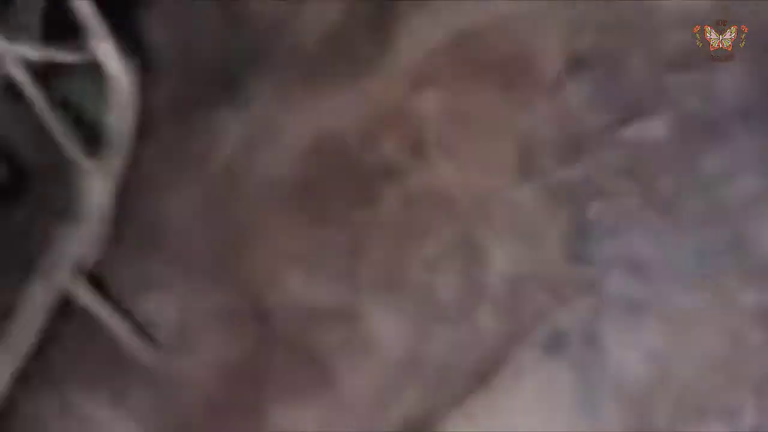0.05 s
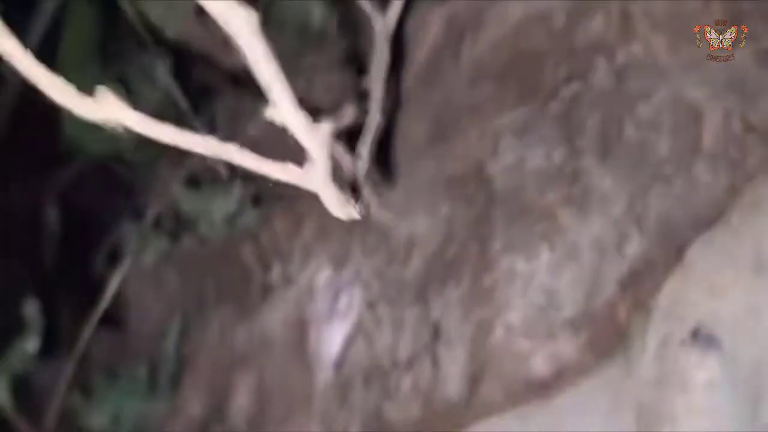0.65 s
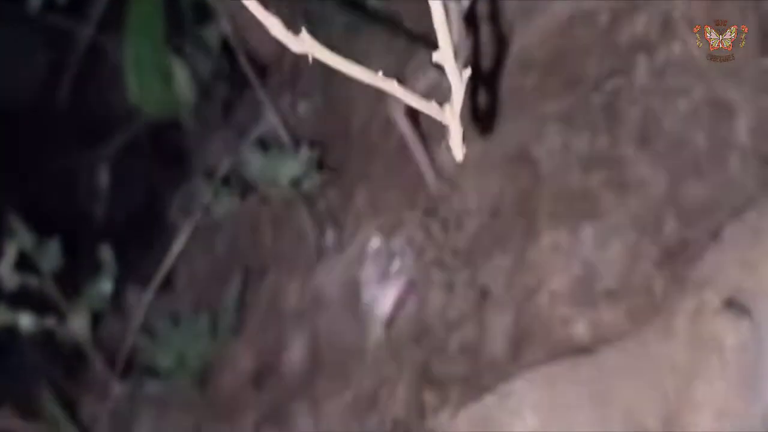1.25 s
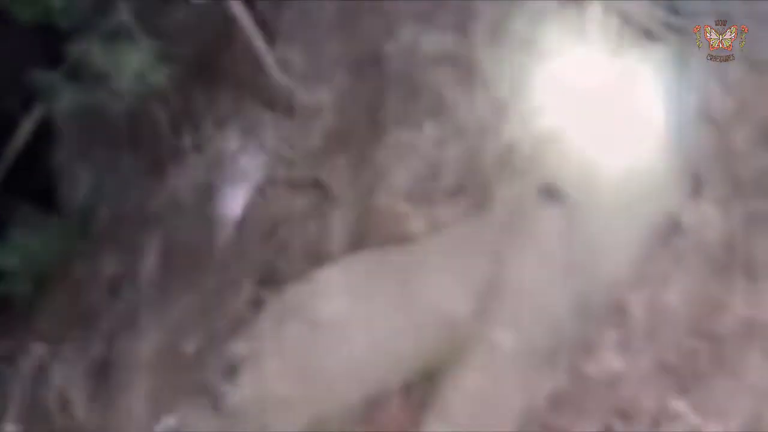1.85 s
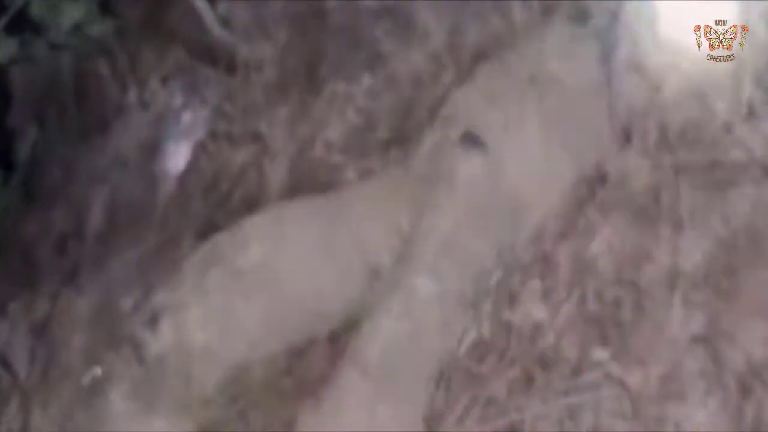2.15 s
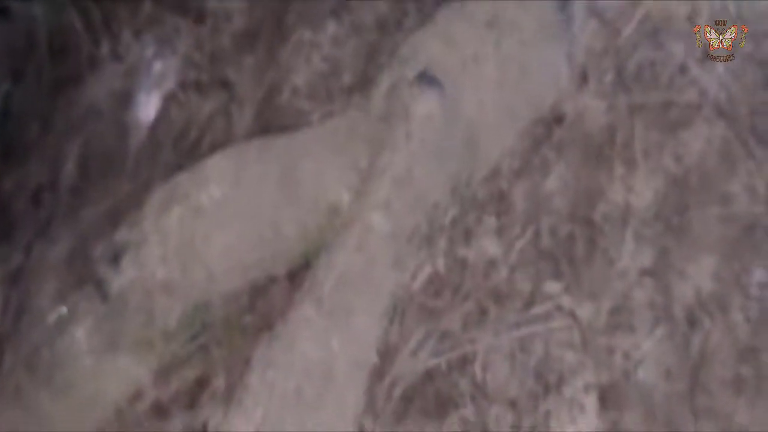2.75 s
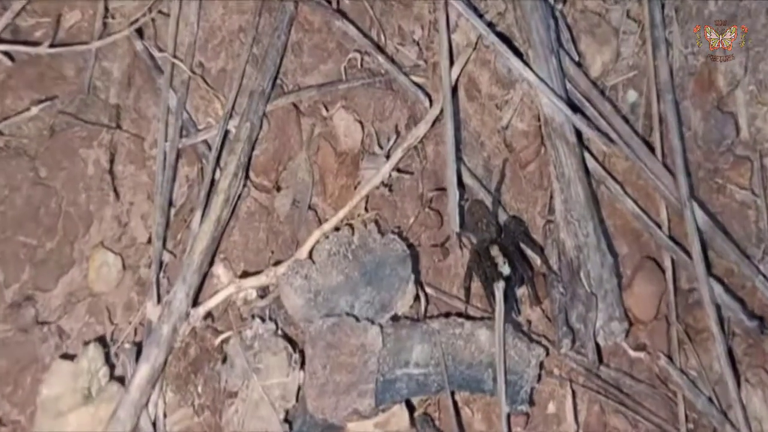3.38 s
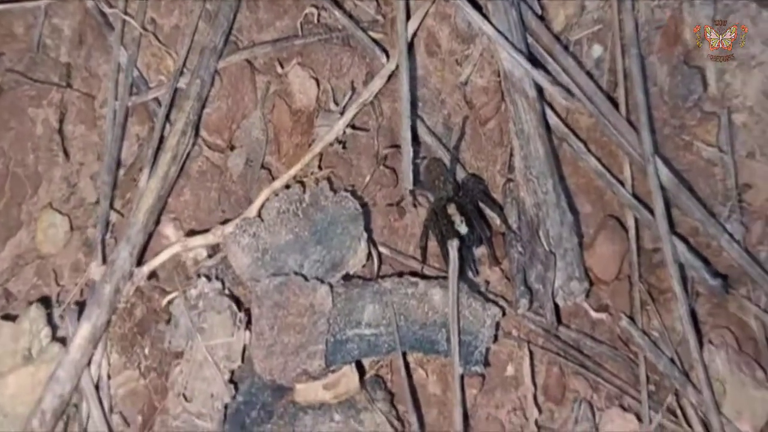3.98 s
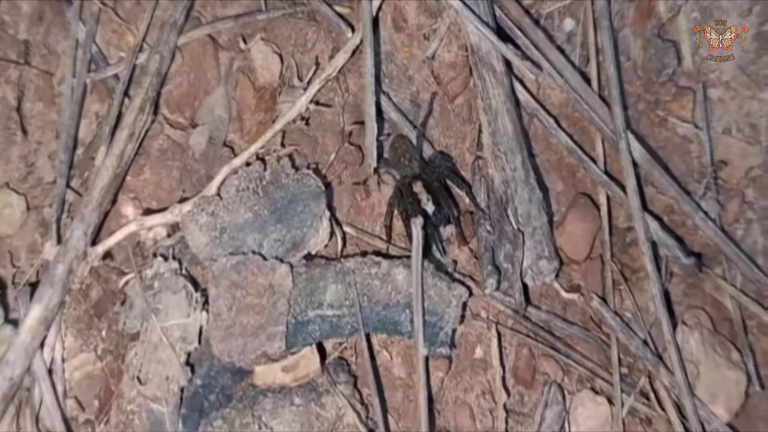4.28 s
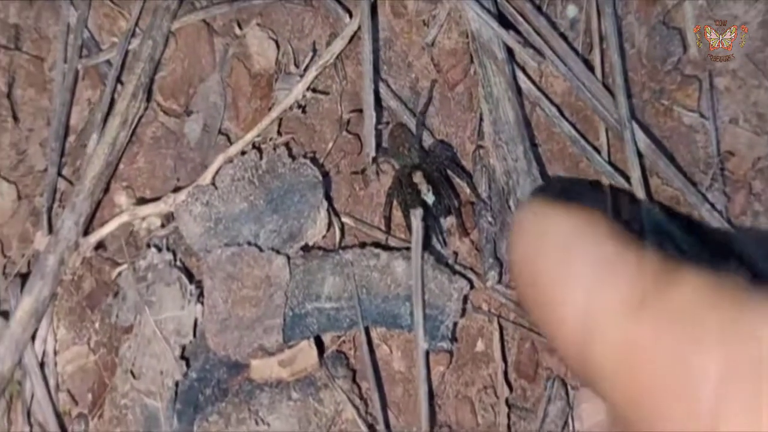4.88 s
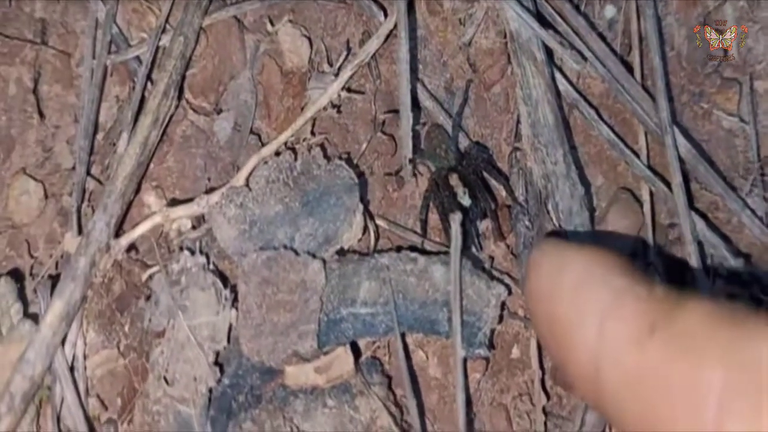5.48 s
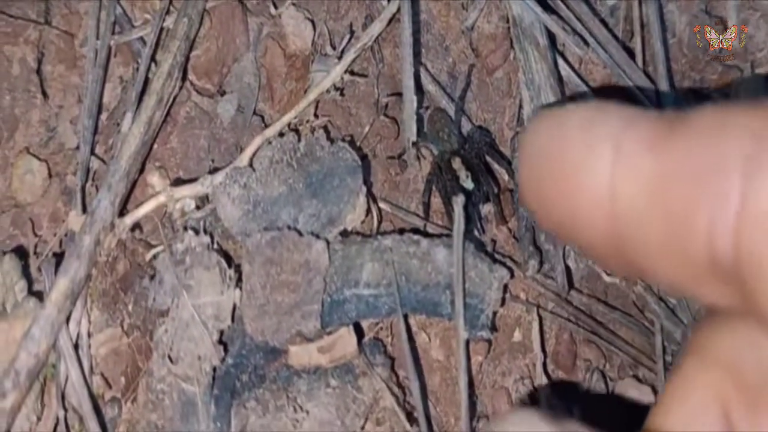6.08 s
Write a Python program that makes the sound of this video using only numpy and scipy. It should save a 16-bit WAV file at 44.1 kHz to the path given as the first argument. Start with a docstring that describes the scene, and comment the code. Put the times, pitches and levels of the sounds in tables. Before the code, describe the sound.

A night forest chorus: high frog trills swell and stop while quick ticks, cricket chirps and a thin hiss carry on.

```python
"""A forest at night. From the start a small frog ticks over a distant chorus, a high hiss and a slow,
almost inaudible bass throb. A near frog and a farther one trill together with pulses of their vocal
sacs, swelling as they go. Faint far whistles and thin rasps come and go, and after a second a cricket
on the right starts chirping steadily with its wings. Past the middle the near frog trills again;
near the end a second cricket joins in and the farther frog answers."""
import sys
import numpy as np
from scipy import signal
from scipy.fft import rfft, irfft
from scipy.io import wavfile
from scipy.ndimage import uniform_filter1d

SR = 44100
rng = np.random.default_rng(int(sys.argv[2]) if len(sys.argv) > 2 else 0)


def transcribe(u):
    """Save the signal u as a 16-bit wav file named by the first command-line argument.

    u: samples, shape (n,) or (channels, n), limited to [-1, 1]; the rate is SR.
    q: integer samples, one column per channel.
    """
    v = np.clip(np.atleast_2d(u).T, -1, 1)
    q = np.round(v * 32767).astype(np.int16)
    wavfile.write(sys.argv[1], SR, q)


N = 270333

# the three pulses of one frog note: delay_s, length_s, relative_db, base_pitch_hz, upward_glide_hz
NOTE_PULSES = [(0, .0074, -5.5, 3190, 350), (.0066, .0074, -1, 3210, 320), (.0133, .0125, 0, 3225, -50)]
# each frog's trills: start_s, note_count, first_notes_per_s, last_notes_per_s, pace_curve (1 = even change)
NEAR_TRILLS = [(.042, 25, 20.68, 19.56, 1.06), (3.358, 30, 20.565, 17.8, 3.31)]
FAR_TRILLS = [(.011, 23, 19.38, 20.5, .5), (4.881, 24, 19.85, 18.33, .68)]
# each frog's effort, swelling through each trill: time_s, relative_db
NEAR_EFFORT = [(.04, -43.3), (.37, -38), (.47, -37.5), (.66, -33), (.76, -34), (.97, -28), (1.09, -30.5),
               (1.22, -28), (3.36, -52.5), (3.65, -41.5), (3.87, -41.5), (4.08, -36), (4.18, -39.5),
               (4.26, -34), (4.76, -27.5), (4.82, -34)]
FAR_EFFORT = [(0, -49), (.22, -50.5), (.35, -52), (.76, -40.5), (1.11, -38.5), (4.88, -48), (5.06, -47.5),
              (5.33, -45.5), (5.5, -42), (6.1, -39.5)]
# the small frog's runs of ticks: start_s, length_s, tick_count
TICK_RUNS = [(0.012, 0.14, 4), (0.242, 0.25, 8), (.59, 0.25, 8), (.946, 0, 1), (.997, .181, 6),
             (1.246, 0, 1), (1.293, .234, 7), (1.63, 0.24, 8), (1.962, .251, 8), (2.325, 0.2, 7),
             (2.632, 0.2, 7), (2.927, 0, 1), (2.98, .177, 6), (3.26, 0.2, 7), (3.553, 0, 1),
             (3.599, 0.2, 7), (3.905, .245, 8), (4.287, 0.24, 7), (4.55, 0, 1), (4.616, 0.18, 6),
             (4.927, .22, 7), (5.269, 0.27, 8), (5.634, .21, 7), (5.932, 0.19, 6)]
# chirps of the cricket on the right: start_s
CHIRP_STARTS = [1.084, 1.691, 2.308, 2.922, 3.51, 4.188, 4.795, 5.396, 6.005]
# tones that wing strokes set around the second cricket's pitch: stroke_rate_multiple, relative_db
STROKE_TONES = [(-3, -21), (-2, -7), (-1, 0.5), (0, -1.5), (1, 2), (2, -8.5), (3, -23)]
# distant whistles and hoots: start_s, length_s, pitch_hz, relative_db
WHISTLES = [(0.5, 0.082, 2440, -57), (1.063, 0.069, 2310, -48), (1.247, 0.066, 661, -63),
            (1.434, 0.11, 676, -63), (1.509, 0.075, 2213, -57), (1.56, 0.072, 2480, -56),
            (2.264, .06, 2400, -60), (2.664, 0.13, 2415, -61), (3.036, .1, 2450, -55),
            (3.719, .12, 2220, -55), (3.789, .12, 2310, -51), (4.243, 0.064, 2460, -58),
            (5.08, 0.088, 2430, -59)]
# leaf rustles and insect rasps: start_s, length_s, centre_hz, width_hz, level_db, left_db, pulsing_0_to_1
RASPS = [(-.06, 0.33, 12350, 1560, -46.5, 7, 0), (0.287, 0.18, 11900, 400, -56, 5, 0),
         (2.769, 0.046, 9500, 1050, -44.5, -1, 0), (2.97, 0.98, 11570, 280, -52, 1, .45)]
# far crickets that merge into steady tones: pitch_hz, width_hz, level_db
CRICKET_DRONES = [(4316, 25, -67), (5150, 14, -66), (5330, 15, -64), (6400, 30, -61.5)]
# the colour of the still air, the distant chorus and the high hiss: frequency_hz, level_db_per_hz
AIR_COLOUR = [(20, -79.5), (100, -82), (300, -88.5), (800, -94), (1800, -96.5), (4500, -87.5),
              (6700, -91.5), (7300, -106), (8000, -106), (8500, -91.5), (15700, -99)]
CHORUS_COLOUR = [(1900, -110), (2400, -86), (2600, -89.5), (2900, -78.5), (3300, -87), (3800, -85.5),
                 (4600, -98.5), (5000, -92), (5280, -89.5), (5650, -93), (6300, -84.5), (6650, -87),
                 (7100, -112)]
HISS_COLOUR = [(8000, -115), (8550, -85.5), (9000, -98.5), (9380, -89.5), (9650, -95), (10600, -84.5),
               (11800, -86), (14000, -90), (15500, -94.5)]
# how alike the background is at the two ears: frequency_hz, likeness_0_to_1
EAR_LIKENESS = [(30, 0.47), (130, 0.1), (300, .42), (1400, 0.47), (2900, 0.98), (4500, 0.41), (6800, 0),
                (15000, 0)]


def trilling_frog(notes, pitch_ratio, overtone_db, resonance_hz, ring, wobble_db):
    """Each note is three pulses of the vocal sac: two short ones slide up, a longer one rings out."""
    out = np.zeros(N, complex)
    loudest_db = max(db for start, db in notes)
    for start, db in notes:
        tuning = pitch_ratio * (1 + 0.0029 * (db - loudest_db))  # soft notes lie a little lower
        bounce_s = rng.uniform(.0015, .006)
        for delay, length, pulse_db, hz, glide_hz in NOTE_PULSES:
            t = clock(length)
            progress = t / length
            strength, detune, late = rng.standard_normal(3)
            pitch = tuning * (hz + glide_hz * (1 - np.exp(-(progress / 0.45) ** 3)) + 18 * detune)
            # the octave above sounds only near one resonance
            overtone = amp(overtone_db) / (1 + ((2 * pitch - resonance_hz) / 220) ** 2)
            shape = (1 - np.exp(-(t / .0008) ** 2)) * np.exp(-progress / ring) * (1 - progress ** 6)
            voice = tone(pitch) + overtone * tone(2 * pitch)
            pulse = amp(db + pulse_db + wobble_db * strength) * shape * voice
            pulse_start = start + delay + .0002 * late
            add(out, pulse_start, pulse)
            add(out, pulse_start + bounce_s, amp(-12) * pulse)  # a ground bounce roughens the note
    return out


def trill_notes(trills, effort):
    """Notes come at a slowly changing pace, as loud as the frog's effort: start_s, relative_db."""
    times = []
    for start, count, first_rate, last_rate, pace_curve in trills:
        rate = first_rate + (last_rate - first_rate) * np.linspace(0, 1, round(count) - 1) ** pace_curve
        times.extend(start + np.r_[0, np.cumsum(1 / rate)])
    return list(zip(times, np.interp(times, *np.transpose(effort))))


def ticking_frog(level_db, hz, ring_s, snap_hz):
    """Each tick is one pulse that starts high and rings down onto its pitch."""
    out, t, times = np.zeros(N, complex), clock(.025), tick_times()
    for start, (wobble_db, detune) in zip(times, rng.standard_normal((len(times), 2))):
        voice = tone(hz + 18 * detune + snap_hz * np.exp(-t / 0.0015))
        shape = (1 - np.exp(-t / 0.0012)) * np.exp(-t / ring_s - (t / 0.012) ** 2)
        add(out, start, amp(level_db + wobble_db) * shape * voice)
    return out


def tick_times(slowing=.3):
    """The small frog starts each run briskly and slows before it rests."""
    times = []
    for start, length, count in TICK_RUNS:
        gaps = 1 + slowing * np.linspace(0, 1, round(count) - 1) ** 2
        times.extend(start + length * np.r_[0, np.cumsum(gaps) / gaps.sum()])
    return times


def chirping_cricket(level_db, hz, strokes_per_s, sweep_hz, rise_hz):
    """Every wing stroke is a falling pip; the strokes grow louder and higher as the chirp gets going."""
    out, t = np.zeros(N, complex), clock(.213)
    stroke = (t * strokes_per_s) % 1  # runs from 0 to 1 in each stroke
    swell = 1 - np.exp(-(t + 0.0084) / 0.0275)
    for start in CHIRP_STARTS:
        waver_hz = 25 * band_noise(len(t), 0, 90).real
        pitch = hz + sweep_hz * (.5 - stroke) - rise_hz * (1 - swell) + waver_hz
        pips = unit_level(tone(pitch) * swell * np.sin(np.pi * stroke) ** 2)
        add(out, start, amp(level_db) * pips * signal.windows.tukey(len(t), .04))
    return out


def buzzing_cricket(level_db, hz, first_s, every_s, strokes_per_s, smear):
    """Fast wing strokes split one tone into a buzz; smear draws each stroke into a falling sweep."""
    out, t = np.zeros(N, complex), clock(0.11)
    strokes = sum(amp(db) * np.exp(1j * (2 * np.pi * round(k) * strokes_per_s * t + smear * k ** 2))
                  for k, db in STROKE_TONES)
    for start in np.arange(first_s, N / SR, every_s):
        cold = np.exp(-((start - first_s) / 0.32) ** 3)  # chirps are softer and higher until it warms up
        pitch = hz + 81.7 * cold + 5 * band_noise(len(t), 0, 13).real
        roughness = 1 + .25 * band_noise(len(t), 0, 140)
        chirp = strokes * tone(pitch) * roughness * signal.windows.tukey(len(t), .7)
        add(out, start, amp(level_db - 8.5 * cold) * unit_level(chirp))
    return out


def whistles(blur_hz, glide):
    """Slightly rising far calls, blurred by the trees."""
    out = np.zeros(N, complex)
    for start, length, hz, db in WHISTLES:
        t = clock(length)
        call = tone(hz * (1 + glide * (t / length - .5)))
        blur = 1 + 0.41 * band_noise(len(t), 0, blur_hz)
        add(out, start, amp(db) * unit_level(call * blur * signal.windows.tukey(len(t), .7)))
    return out


def rasps(fade_s, pulses_per_s):
    """Leaves and insects make soft bursts of high noise, different at each ear; the long rasp pulses."""
    out = np.zeros((2, N))
    for start, length, hz, width_hz, db, left_db, depth in RASPS:
        t = clock(length)
        shape = signal.windows.tukey(len(t), min(2 * fade_s / length, .7))
        shape *= 1 - depth * np.cos(2 * np.pi * pulses_per_s * t)
        for ear, side in zip(out, (.5, -.5)):
            burst = unit_level(band_noise(len(t), hz, width_hz).real * shape)
            add(ear, start, amp(db + side * left_db) * burst)
    return out


def far_crickets():
    """Many crickets merge into narrow, wavering tones that reach each ear by different paths."""
    return np.array([sum(amp(db) * unit_level(band_noise(N, hz, width_hz).real)
                         for hz, width_hz, db in CRICKET_DRONES) for ear in range(2)])


def high_hiss(flutter_hz, depth):
    """A smooth, finely ringing hiss, stronger on the left, where it flutters faintly and evenly."""
    hiss = background(HISS_COLOUR, patchy_db=.4, left_db=6.5, lead_rad=.1, ripple_db=3)
    angle = 2 * np.pi * flutter_hz * np.arange(N) / SR
    hiss[0] *= 1 + depth * (np.cos(angle) + np.cos(2 * angle))
    return hiss


def bass_throbs(level_db, hz, first_s, every_s, width_s, lag_s):
    """Each throb is one slow, almost inaudible sub-bass pulse, repeating evenly: down, up, down again."""
    t = np.arange(N) / SR - np.arange(first_s, N / SR, every_s)[:, None]  # one row for each throb
    swings = np.cos(2 * np.pi * hz * t) * np.exp(-((t - lag_s) / width_s) ** 2)
    return amp(level_db) * swings.sum(0)


def background(colour, patchy_db, left_db, lead_rad, ripple_db):
    """Noise with drifting louder patches and a fine, unchanging ripple in its colour."""
    frames, hz = N // 256 + 5, np.fft.rfftfreq(1024, 1 / SR)
    a, b, c, d, patches = rng.standard_normal((5, frames, len(hz)))
    patches = uniform_filter1d(patches, size=7, axis=0)  # smooth over time
    patches = unit_level(uniform_filter1d(patches, size=9, axis=1))  # and over frequency
    likeness = np.clip(curve_at(EAR_LIKENESS, hz), 0, 1)
    left = a + 1j * b
    right = likeness * np.exp(-1j * lead_rad) * left + np.sqrt(1 - likeness ** 2) * (c + 1j * d)
    ears = np.array([left, right]) * amp(patchy_db * patches)
    noise = signal.istft(ears, nperseg=1024, noverlap=768, time_axis=-2, freq_axis=-1)[1]
    fine_hz = np.fft.rfftfreq(N, 1 / SR)
    bumps = unit_level(uniform_filter1d(rng.standard_normal((2, len(fine_hz))), size=200, axis=1))
    ripple = unit_level(amp(ripple_db * bumps))
    gain = ripple * amp(curve_at(colour, fine_hz) + left_db * np.array([[.5], [-.5]]))
    return irfft(rfft(unit_level(noise[:, :N])) * gain, N) * np.sqrt(SR / 2)


def in_forest(call, left_db, lead_rad, early_db, late_db, tail_s):
    """Places a caller: direct sound, quick echoes off ground and leaves, a thin tail from the trees."""
    t, side = clock(.6), np.array([[.5], [-.5]])
    bounces = rng.standard_normal((2, 2, len(t))) * (rng.random((2, 2, len(t))) < .15)
    early = bounces[0] * (t > .0007) * np.exp(-t / 0.0048)
    late = bounces[1] * (t > .008) * amp(-60 * t / tail_s)
    paths = sum(amp(db) * part / np.linalg.norm(part, axis=1, keepdims=True)
                for db, part in [(early_db, early), (late_db, late)])
    echoes = signal.fftconvolve(call[None], paths, axes=1)[:, :N]
    # the left ear's wave is lead_rad ahead of the right's and left_db louder
    direct = call * np.exp(1j * side * lead_rad)
    return np.sqrt(2) * amp(side * left_db) * (direct + echoes).real


def amp(db):
    """Turns decibels into a gain."""
    return 10 ** (np.asarray(db) / 20)


def unit_level(sound):
    """Scales a sound to an average power of 1."""
    return sound / np.sqrt(np.mean(abs(sound) ** 2) + 1e-20)


def curve_at(points, hz):
    """Joins the points by straight lines on a log-frequency axis."""
    point_hz, value = np.transpose(points)
    return np.interp(np.log(hz + 1), np.log(point_hz + 1), value)


def clock(length_s):
    """The time of each sample, in seconds."""
    return np.arange(int(length_s * SR)) / SR


def add(mix, start_s, sound):
    """Mixes a sound in at its start time."""
    start = round(start_s * SR)
    sound = sound[max(-start, 0):]
    part = mix[max(start, 0):][:len(sound)]
    part += sound[:len(part)]


def tone(hz):
    """A pure tone that follows a pitch curve, as complex numbers so its phase is easy to shift."""
    return np.exp(2j * np.pi * np.cumsum(hz) / SR)


def band_noise(size, hz, width_hz):
    """Complex noise in a bell-shaped band; around 0 Hz it is a random waver."""
    bell = np.exp(-.25 * ((np.fft.fftfreq(size, 1 / SR) - hz) / width_hz) ** 2)
    return unit_level(np.fft.ifft(np.fft.fft(rng.standard_normal(size)) * bell))


def scene():
    """All callers, each at its own place, over the background."""
    near = amp(5.0) * trilling_frog(trill_notes(NEAR_TRILLS, NEAR_EFFORT), pitch_ratio=1.013,
                                    overtone_db=-19.5, resonance_hz=6400, ring=1.07, wobble_db=0.74)
    far = amp(4.0) * trilling_frog(trill_notes(FAR_TRILLS, FAR_EFFORT), pitch_ratio=1.072,
                                   overtone_db=-17, resonance_hz=6720, ring=0.78, wobble_db=0.61)
    ticks = ticking_frog(level_db=-36.0, hz=2762, ring_s=0.0074, snap_hz=360)
    chirps = chirping_cricket(level_db=-51.5, hz=6102, strokes_per_s=66, sweep_hz=330, rise_hz=276)
    buzzes = buzzing_cricket(level_db=-41.5, hz=5025, first_s=4.753, every_s=.1603,
                             strokes_per_s=74.5, smear=.95)
    calls = amp(-2.5) * whistles(blur_hz=55, glide=0.021)
    out = in_forest(near, left_db=-2.2, lead_rad=-.6, early_db=-12, late_db=-13, tail_s=.25)
    out += in_forest(far, left_db=-7.5, lead_rad=-0.78, early_db=-3.5, late_db=-5, tail_s=.3)
    out += in_forest(ticks, left_db=-1, lead_rad=-0.63, early_db=-26, late_db=-9.5, tail_s=0.34)
    out += in_forest(chirps, left_db=-13, lead_rad=.1, early_db=-11, late_db=-13, tail_s=.3)
    out += in_forest(buzzes, left_db=0, lead_rad=.75, early_db=-7, late_db=-4.5, tail_s=.38)
    out += in_forest(calls, left_db=-2.5, lead_rad=-.05, early_db=-14, late_db=-4.5, tail_s=0.32)
    out += rasps(fade_s=0.096, pulses_per_s=5.1) + far_crickets()
    out += bass_throbs(level_db=-35, hz=6.32, first_s=.042, every_s=.9385, width_s=0.11, lag_s=0.0058)
    out += background(AIR_COLOUR, patchy_db=1.55, left_db=-0.5, lead_rad=.05, ripple_db=0.42)
    out += background(CHORUS_COLOUR, patchy_db=2.0, left_db=-0.5, lead_rad=-0.12, ripple_db=2.5)
    return out + high_hiss(flutter_hz=10.77, depth=0.15)


def record(dry):
    """Cuts away the very highest treble."""
    low_pass = signal.firwin(801, 15640, window=("kaiser", 9), fs=SR)
    return signal.oaconvolve(dry, low_pass[None], "same")


dry = scene()
out = record(dry)
transcribe(out)
```